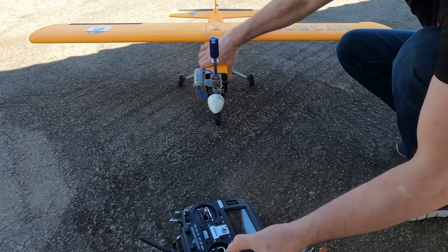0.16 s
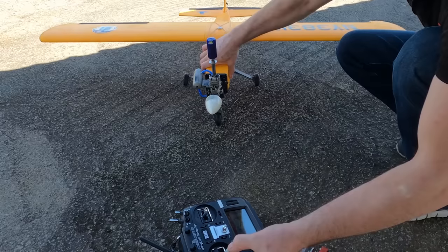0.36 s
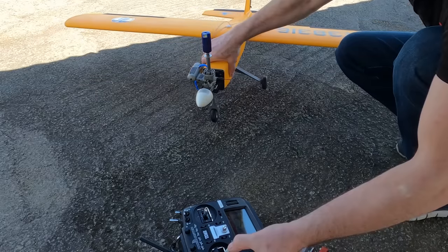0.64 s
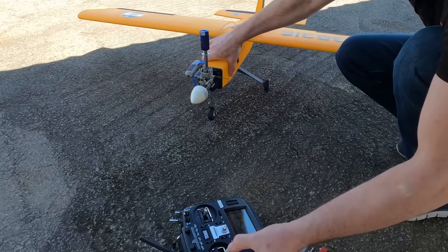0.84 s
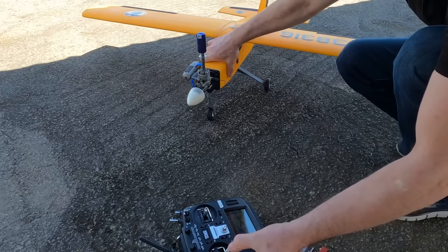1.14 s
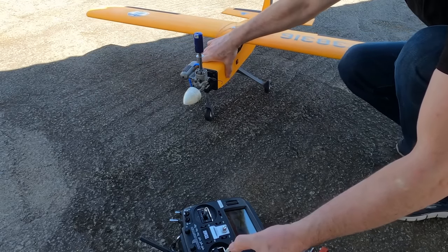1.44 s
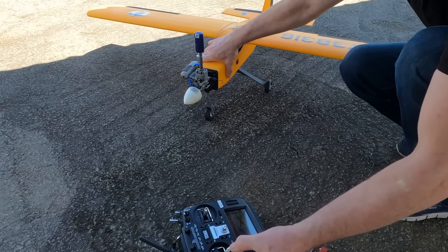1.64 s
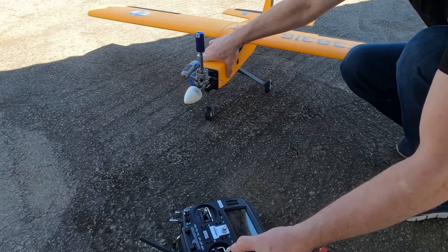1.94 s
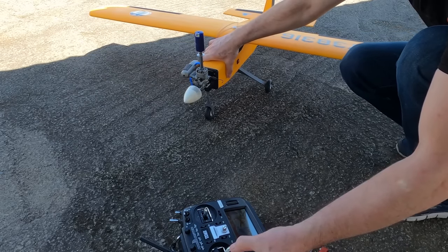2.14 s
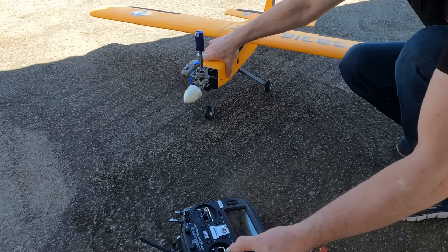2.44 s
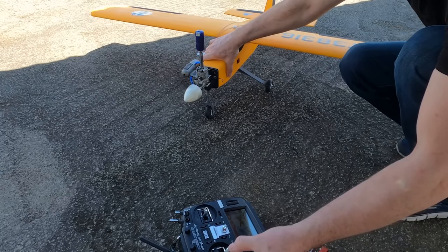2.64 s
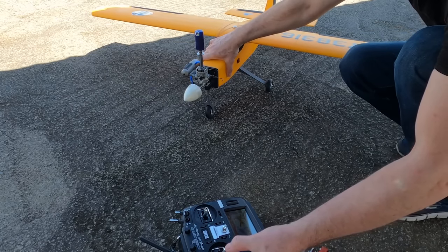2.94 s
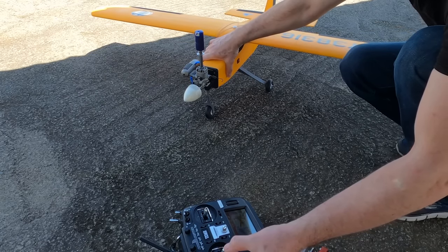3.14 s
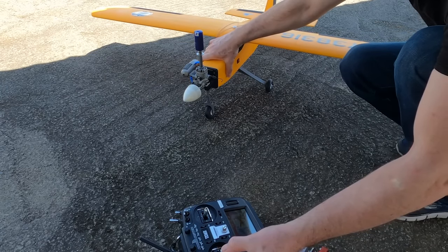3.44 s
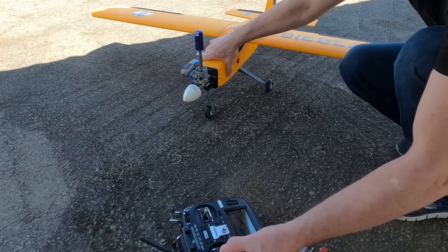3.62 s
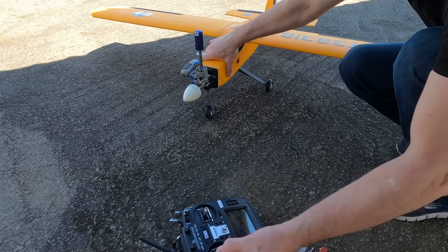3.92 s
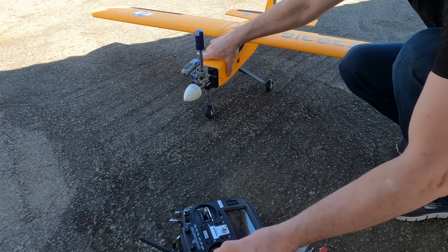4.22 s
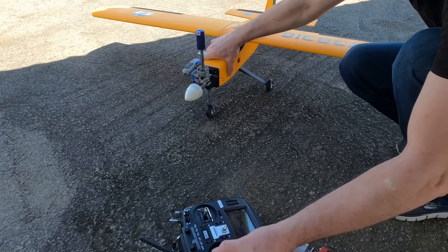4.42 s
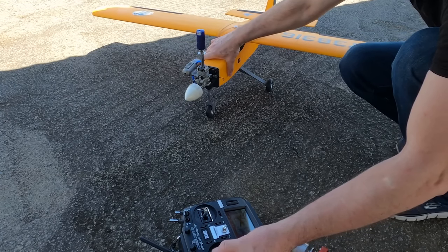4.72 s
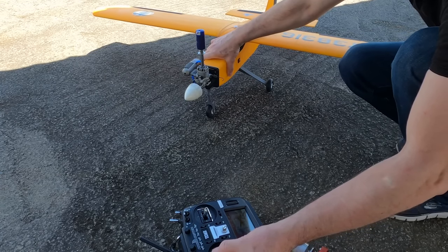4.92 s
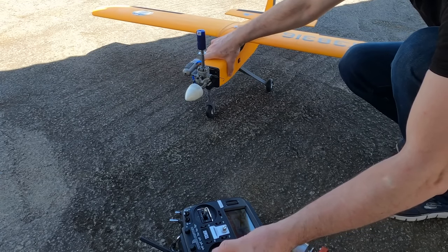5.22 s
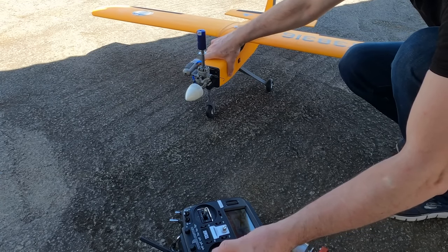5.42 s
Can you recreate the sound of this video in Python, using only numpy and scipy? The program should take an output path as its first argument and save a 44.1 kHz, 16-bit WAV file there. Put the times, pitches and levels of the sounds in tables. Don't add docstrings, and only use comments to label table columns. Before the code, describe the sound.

A tiny two-stroke engine ticks over with hollow, metallic pops that skip and stumble, with faint hiss and propeller flutter. It suddenly revs, much louder, to a dense buzzing scream with hissing intake and rushing air, then settles to a coarser, lower-pitched drone held to the end. Close, dry, bass-light outdoor pickup.

```python
import sys
import numpy as np
from scipy import signal
from scipy.fft import rfft, irfft, next_fast_len
from scipy.io import wavfile
from scipy.ndimage import uniform_filter1d

SR = 44100
rng = np.random.default_rng(int(sys.argv[2]) if len(sys.argv) > 2 else 0)


def wav_record(signal):
    frames = np.transpose(np.atleast_2d(signal))
    bounded = np.clip(frames, -1, 1)
    quanta = np.round(bounded * 32767).astype(np.int16)
    wavfile.write(sys.argv[1], SR, quanta)


def to_linear_factor(level_db):
    exponent = np.asarray(level_db, float) / 20
    return 10 ** exponent


N = 245637

# start_s, crank_hz, effort_db
RUN = [(2.86, 75, -11.5), (3.0, 99, -6.5), (3.1, 112.2, -3.5), (3.22, 134.3, 1), (3.28, 139.7, 2),
       (3.42, 153.4, 1), (3.54, 157.8, 1), (3.61, 163.7, 0.2), (4.13, 180.7, 1.1), (4.22, 182.7, 2.7),
       (4.47, 172.3, -0.6), (4.54, 167.9, -0.1), (4.74, 169.9, 1.2), (4.96, 170.1, -1.5),
       (5.06, 167.5, 1.6), (5.2, 169.6, 2), (5.57, 170, -0.9)]
# start_s, every_second_weaker_db, silencer_pitch_factor
SKIP = [
    (3.12, 1, 1.235),
    (3.22, 2.5, 0.956),
    (3.55, 1.5, 1.044),
    (4.15, 0, 1.04),
    (4.3, 10.5, 1.1),
    (4.52, 11.5, 1.057),
    (5.57, 10.5, 1.067),
]
# start_s, throttle_0_to_1
OPENING = [
    (2.88, 0),
    (3.17, 0.95),
]


def evened(x):
    return x / np.sqrt(np.mean(x ** 2) + 1e-20)


def read(points, hz):
    f, value = np.transpose(points)
    return np.interp(np.log(hz + 1), np.log(f + 1), value)


def curves(rows):
    s, *columns = np.transpose(rows)
    return [np.interp(np.arange(N) / SR, s, c) for c in columns]


def resonate(x, hz, width_hz, order=2):
    carrier = np.exp(2j * np.pi * np.cumsum(hz * np.ones(N)) / SR)
    r = np.exp(-np.pi * width_hz / SR)
    smooth = signal.lfilter([(1 - r) ** order], np.poly([r] * order), x / carrier + 1e-18)
    return 2 * (carrier * smooth).real


def ring(clicks, modes):
    t = np.arange(512) / SR
    shape = np.zeros(512)
    for hz, width_hz, db in modes:
        swell = (np.pi * width_hz * t / 2) ** 2 * np.exp(2 - np.pi * width_hz * t)
        shape += to_linear_factor(db) * swell * np.cos(2 * np.pi * hz * t)
    return signal.oaconvolve(clicks, shape)[:N]


def drift(hz):
    coarse = rng.standard_normal(N // 100 + 2)
    slow = signal.lfilter(*signal.butter(2, hz, fs=SR / 100), coarse)
    return evened(np.interp(np.arange(N) / 100, np.arange(len(slow)), slow))


def gate(turns, angle, width):
    return np.exp(-.5 * (((turns - angle + .5) % 1 - .5) / width) ** 2)


def train(turns, size):
    at = np.interp(np.arange(np.ceil(turns[0]), turns[-1] - 1), turns, np.arange(N))
    whole, out = at.astype(int), np.zeros(N)
    out[whole] = size[whole] * (1 - at + whole)
    out[whole + 1] = out[whole] * (at - whole) / np.maximum(1 - at + whole, 1e-9)
    return out


def pops():
    # first_s, last_s, firings, peak_db
    streaks = [(.0407, .0807, 2, -13.5), (.1847, .3401, 4, -14), (.3911, .5435, 4, -14.5),
               (.595, .8034, 5, -14), (.8425, .9476, 3, -14), (1.0129, 1.0265, 2, -15.5),
               (1.0798, 1.1871, 3, -13.5), (1.2523, 1.3044, 2, -14), (1.4594, 1.562, 3, -13.5),
               (1.6016, 1.7583, 4, -15), (1.8245, 2.1458, 7, -13.5), (2.2259, 2.3862, 4, -13.5),
               (2.4253, 2.4643, 2, -13.5), (2.5295, 2.5431, 2, -14), (2.5824, 2.596, 2, -17),
               (2.6093, 2.8235, 5, -15), (2.8883, 2.9007, 2, -14), (2.9127, 2.9906, 8, -17.5),
               (3.0111, 3.0688, 4, -15.5), (3.0867, 3.1387, 4, -18.5)]
    # start_s, peak_db
    strays = [(.0945, -17), (.1193, -20), (.1459, -15), (.2757, -16), (.3784, -18), (.5821, -15),
              (.6727, -17), (.8824, -13), (.9355, -16), (1.2262, -14), (1.3437, -15), (1.3566, -17),
              (1.3823, -16), (1.4077, -18), (1.4206, -20), (1.6929, -18), (1.7982, -13), (1.9189, -19),
              (1.9727, -18), (2.0792, -18), (2.1727, -16), (2.3732, -17), (2.4901, -20), (2.7028, -16),
              (2.8101, -19), (2.8631, -14), (2.8755, -20)]
    rows = list(strays)
    for first_s, last_s, count, db in streaks:
        rows += [(s, db) for s in np.linspace(first_s, last_s, round(count))]
    return np.transpose(sorted(rows))


def crank():
    s, t, speed_hz = pops()[0], np.arange(N) / SR, curves(RUN)[0]
    between = np.round(np.diff(s) * speed_hz[(s[1:] * SR).astype(int)])
    counted = np.r_[0, np.cumsum(between)]
    idle = np.interp(t, np.r_[s[0] - 1, s], np.r_[-speed_hz[0], counted])
    return idle + np.cumsum(speed_hz * (1 + .003 * drift(hz=40)) * (t > s[-1])) / SR


def exhaust(turns):
    # mode_hz, width_hz, level_db
    silencer = [(2340, 426, 1), (2487, 220, -16.5), (1403, 600, -11.5), (3190, 180, -16),
                (3725, 360, -14.5), (6080, 460, -15), (8120, 1000, -22.5), (666, 910, -16),
                (4440, 4200, -9)]
    # mode_hz, width_hz, level_db
    crack = [(1364, 760, -10.5), (3074, 730, -3.5), (3673, 630, -3), (4300, 1580, -2.5), (6330, 330, -19.5),
             (8600, 920, -18.5)]
    # mode_hz, width_hz, level_db
    thump = [(540, 540, -14.5), (858, 620, -11)]
    s, peak_db = pops()
    late = np.arange(N) > (s[-1] + .002) * SR
    weak_db, pitch_factor = curves(SKIP)
    odd, throttle = np.round(turns) % 2, curves(OPENING)[0]

    full_db = -15.5 + 0.43 * curves(RUN)[1] + 0.072 * weak_db
    size = to_linear_factor(full_db - weak_db * odd + 1.4 * rng.standard_normal(N)) * late
    blows = train(turns, size)
    puff = to_linear_factor(-29 + 5 * drift(hz=100)) * ~late
    puff *= ~np.isin(np.round(turns), np.round(turns[(s * SR).astype(int)]))
    blows += train(turns + .11, puff)
    peak_db = peak_db - 0.1 * rng.standard_normal(len(s))
    blows[((s - .0012) * SR).astype(int)] = to_linear_factor(peak_db + 2.0 + 5.9 * np.interp(s, *np.transpose(OPENING)))
    turbulent = signal.lfilter(np.hanning(40), 1, blows) * rng.standard_normal(N)
    drive = blows + (.03 - .005 * throttle) * turbulent
    open_drive, idle_drive = drive * throttle, drive * (1 - throttle)

    hot_hz, hot_width_hz = 2184 * pitch_factor * (1 + .03 * drift(hz=5)), 590
    hot = resonate(open_drive, hot_hz, hot_width_hz, order=3) * SR / hot_width_hz * 0.58
    edge = sum(ring(open_drive * to_linear_factor(2.6 * drift(hz=5)), [mode]) for mode in crack)

    kick_back_db = 5.5
    kick = to_linear_factor(full_db - 0.47 * weak_db + 3.5 * drift(hz=4.1)) * throttle * (1 - odd * weak_db / kick_back_db)
    kicks = train(turns, kick)

    varied = idle_drive * to_linear_factor(2.2 * drift(hz=60))
    cold = ring(idle_drive, silencer[:1]) + ring(varied, silencer[1:2])
    cold = cold + ring(idle_drive * to_linear_factor(2.2 * drift(hz=60)), silencer[2:])
    intake_lead_s = .0028
    cold = cold + ring(np.roll(varied, -round(intake_lead_s * SR)), [(5235, 540, -19.5)])
    return cold + hot + edge + ring(kicks, thump)


def pumping(turns):
    # mode_hz, width_hz, level_db
    ports = [(1183, 337, -10), (1528, 424, -3.5), (1872, 340, -.5)]
    # mode_hz, width_hz, level_db
    blades = [(2523, 790, -4.5), (3293, 780, 0.5), (4025, 1280, 0.5), (4640, 1620, -3.5)]
    throttle, weak_db = curves(OPENING)[0], curves(SKIP)[0]
    speed_hz, effort_db = curves(RUN)
    gain_hz_per_s = uniform_filter1d(np.gradient(speed_hz) * SR, size=5000)
    ports_db = -27.5 + 0.54 * weak_db - 0.076 * effort_db - 16.0 * (1 - throttle)
    blades_db = -16.5 + 0.015 * gain_hz_per_s + 0.55 * effort_db - 13.2 * (1.5 - throttle)

    uneven = to_linear_factor(1.5 * rng.standard_normal(N) + 1.2 * drift(hz=9))
    first, second = train(turns - .04, uneven), train(turns - .54, uneven)
    gas = ring((0.85 * first - second) * to_linear_factor(ports_db), ports)
    narrow = signal.lfilter(*signal.butter(N=3, Wn=1000, btype="high", fs=SR), gas)
    slap = (first + 1.56 * second) * to_linear_factor(blades_db)
    rings = [ring(slap * to_linear_factor(2.5 * drift(hz=5.3)), [mode]) for mode in blades]
    return narrow + sum(rings[1:]) - rings[0]


def hisses(turns):
    # centre_hz, width_hz, level_db, crank_angle_turns, open_turns
    leaks = [(1522, 250, -38.5, 0.69, 0.32), (3163, 105, -41.5, 0.24, 0.32), (5200, 590, -42.5, 0.72, 0.18),
             (4050, 840, -41.5, 0.83, 0.9)]
    # start_s, pitch_hz, level_db
    whistle = [
        (2.84, 6080, -56),
        (2.92, 6040, -38.5),
        (3.1, 6360, -31),
        (3.6, 6490, -29.5),
        (4.2, 6760, -30.5),
        (4.28, 6600, -37),
        (4.4, 6574, -31),
        (5.57, 6510, -33),
    ]
    out, idle = np.zeros(N), 1 - .85 * curves(OPENING)[0]
    for hz, width_hz, db, angle, open_turns in leaks:
        puff = gate(turns, angle, open_turns) * to_linear_factor(3.8 * drift(hz=36)) * rng.standard_normal(N)
        out += to_linear_factor(db) * idle * evened(resonate(puff, hz, 1.36 * width_hz, order=3))

    hz, db = curves(whistle)
    weak_db = curves(SKIP)[0]
    twin_db = db - 14.5 + 1.13 * np.minimum(weak_db, 10)
    breath = gate(turns, .12, .2) * to_linear_factor(-.7 * weak_db * (np.round(turns) % 2))
    out += to_linear_factor(db) * evened(resonate(breath * rng.standard_normal(N), hz, 330))
    return out + to_linear_factor(twin_db) * evened(resonate(breath * rng.standard_normal(N), 6080, 360))


def hum(turns):
    # crank_multiple, idle_db, running_db
    orders = [(1, -50, -31.5), (2, -36.5, -39), (3, -47, -68), (4, -59.5, -48.5)]
    throttle, out = curves(OPENING)[0], np.zeros(N)
    for multiple, idle_db, run_db in orders:
        db = idle_db + (run_db - idle_db) * throttle ** .3 + 2.0 * drift(hz=4.3)
        out += to_linear_factor(db) * np.sin(2 * np.pi * multiple * turns)
    return out


def rush(turns):
    # band_hz, density_db_per_hz
    rush_idle = [(150, -7.5), (330, -16.5), (700, -17), (1000, -17.5), (1500, -8.5), (2300, -9), (3100, -5),
                 (4600, -13.5), (6100, -17.5), (7100, -23.5), (9200, -23.5), (10200, -28.5), (15500, -42)]
    rush_run = [(150, -35), (330, -39), (700, -40), (1000, -37), (1500, -20.5), (2300, -16), (3500, -15.5),
                (5000, -17),
                (5700, -20.5), (7200, -21), (9000, -21.5), (10200, -29.5), (12500, -32.5), (15500, -48)]
    # band_hz, likeness_0_to_1
    likeness = [(60, 0.91), (180, 0.98), (550, 1), (1650, 0.94), (4970, 0.82), (8000, 1), (12000, 0.28),
                (15000, .3)]
    size = next_fast_len(N)
    hz, throttle = np.fft.rfftfreq(size, 1 / SR), curves(OPENING)[0]
    a, b = rfft(rng.standard_normal((2, size)))
    same = np.clip(read(likeness, hz), 0, 1)
    pair = np.array([a, same * a + np.sqrt(1 - same ** 2) * b])
    idle = evened(irfft(pair * to_linear_factor(read(rush_idle, hz)), size)[:, :N])
    run = evened(irfft(pair * to_linear_factor(read(rush_run, hz)), size)[:, :N])
    beat = 1 + (.5 + 1.2 * throttle) * gate(turns, .07, .09) + (.3 + 1.1 * throttle) * gate(turns, .57, .09)
    mixed = to_linear_factor(17.5) * idle * (1 - throttle) + to_linear_factor(4.5) * run * throttle
    return to_linear_factor(-37.5 + curves(RUN)[1] + 0.93 * drift(hz=29)) * beat * mixed


def scene():
    # delay_s, left_db, right_db
    echoes = [(.0011, -27, -15), (.0023, -12, -20), (.0037, -36, -16), (.0061, -34, -16.5),
              (.0094, -16, -19)]
    turns = crank()
    engine = exhaust(turns) + pumping(turns) + hisses(turns)
    taps = np.zeros((2, 600))
    taps[:, 0] = 1
    for s, left_db, right_db in echoes:
        taps[:, round(s * SR)] = to_linear_factor(left_db), -to_linear_factor(right_db)
    echoed = signal.oaconvolve(engine[None], taps, axes=1)[:, :N]
    return echoed / to_linear_factor(2.0) + hum(turns) + rush(turns)


def roll_off(x):
    return signal.sosfilt(signal.butter(12, 15660, fs=SR, output="sos"), x)


def record(dry):
    # band_hz, left_over_right_db
    balance = [(60, 3), (180, 4), (550, -2), (1650, 2.5), (4970, 2), (15000, -3)]
    # start_s, extra_left_over_right_db
    turning = [
        (0, -.8),
        (1.5, -.2),
        (3, .2),
        (5.57, .4),
    ]
    lag_s = 2.2e-5
    thin = signal.sosfilt(signal.butter(N=4, Wn=965, btype="high", fs=SR, output="sos"), dry)
    size = next_fast_len(N + 4096)
    hz = np.fft.rfftfreq(size, 1 / SR)
    left = to_linear_factor(read(balance, hz) / 2) * np.exp(-1j * np.pi * hz * lag_s)
    pair = irfft(rfft(thin, size) * np.array([left, 1 / left]), size)[:, :N]
    pair = pair * to_linear_factor(np.outer([.5, -.5], curves(turning)[0]))
    rumble = signal.lfilter(*signal.butter(2, 200, fs=SR), rng.standard_normal(N))
    floor = to_linear_factor(-104 + 1.7 * drift(hz=2.5)) * evened(rumble) * to_linear_factor([[-3], [3]])
    return roll_off(pair + floor)


dry = scene()
out = record(dry)
wav_record(out)
```